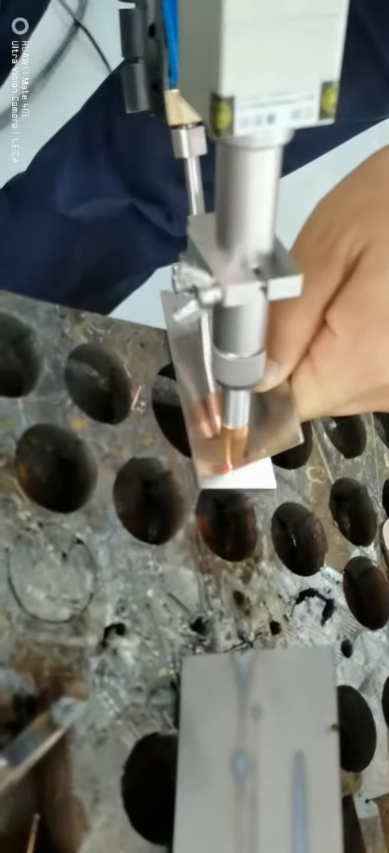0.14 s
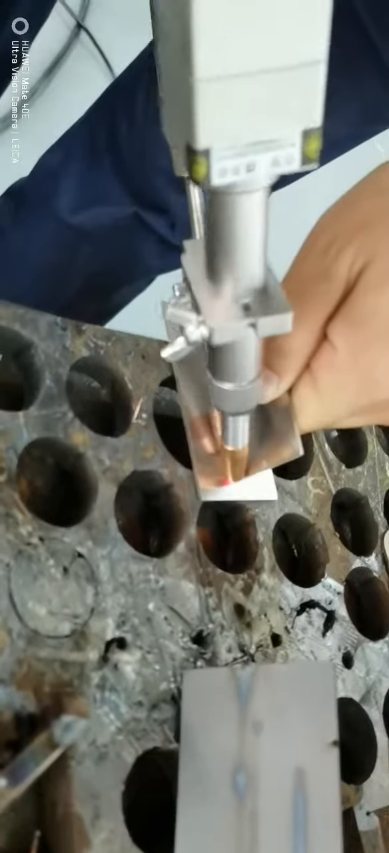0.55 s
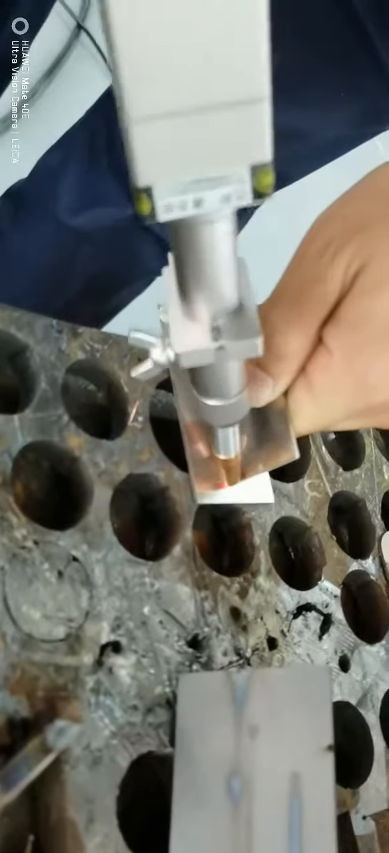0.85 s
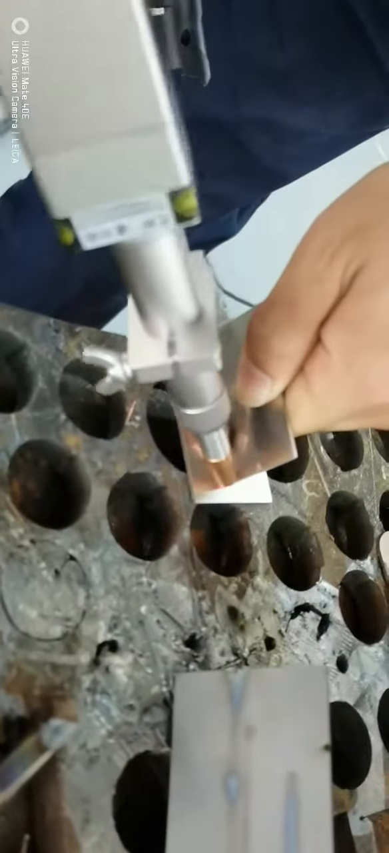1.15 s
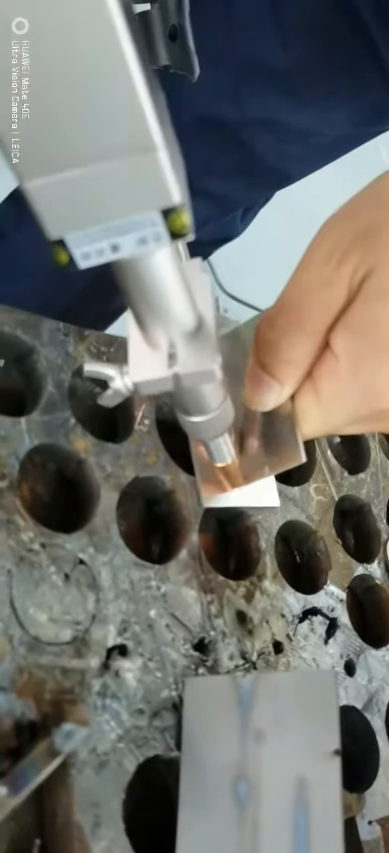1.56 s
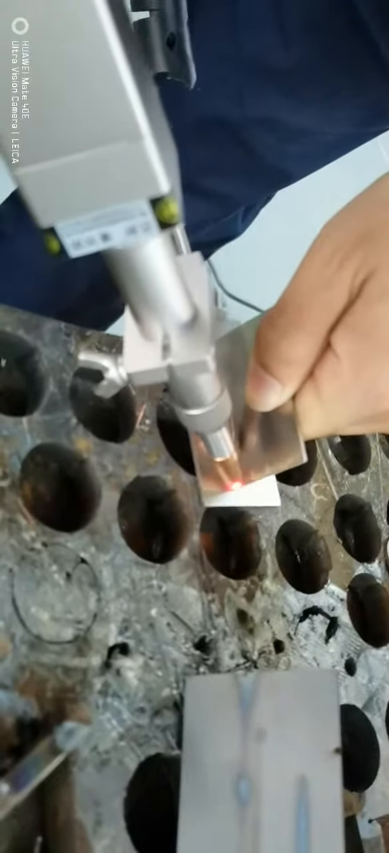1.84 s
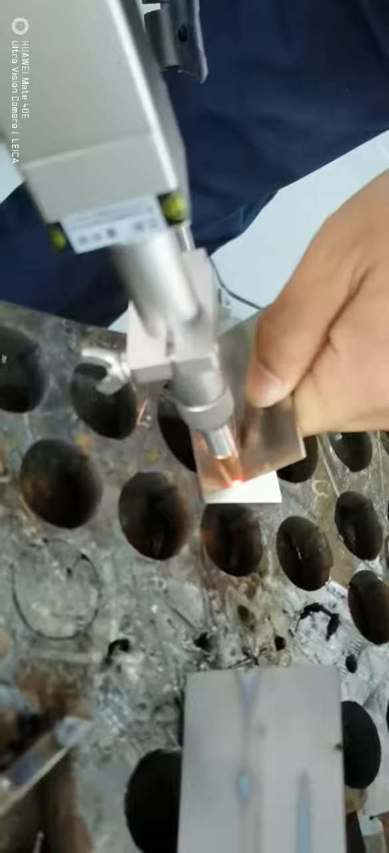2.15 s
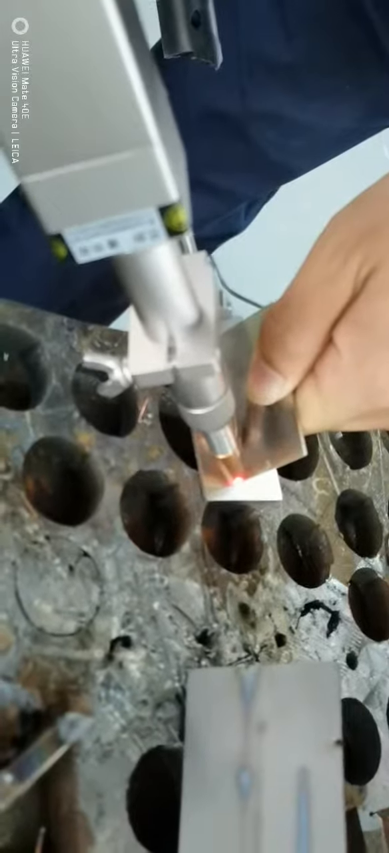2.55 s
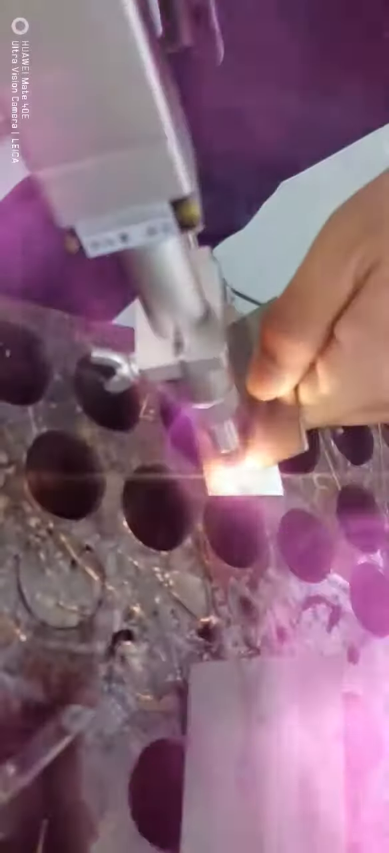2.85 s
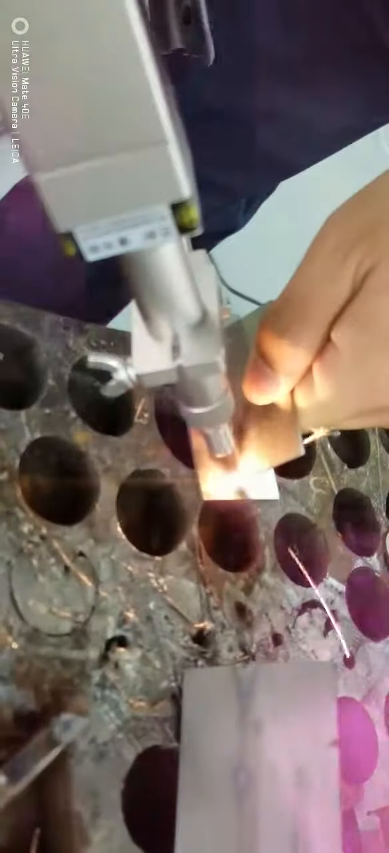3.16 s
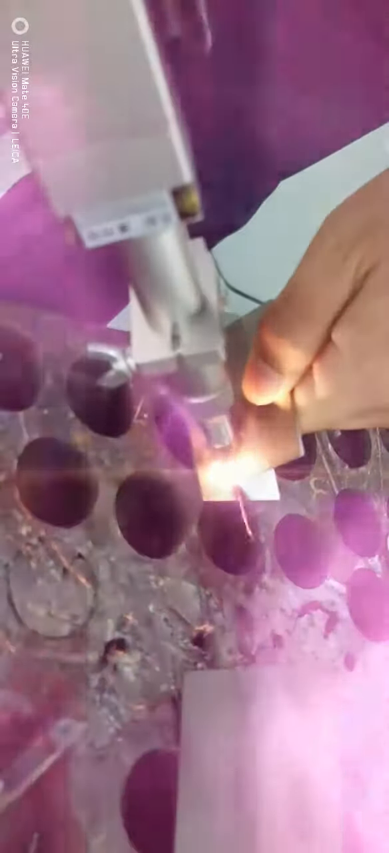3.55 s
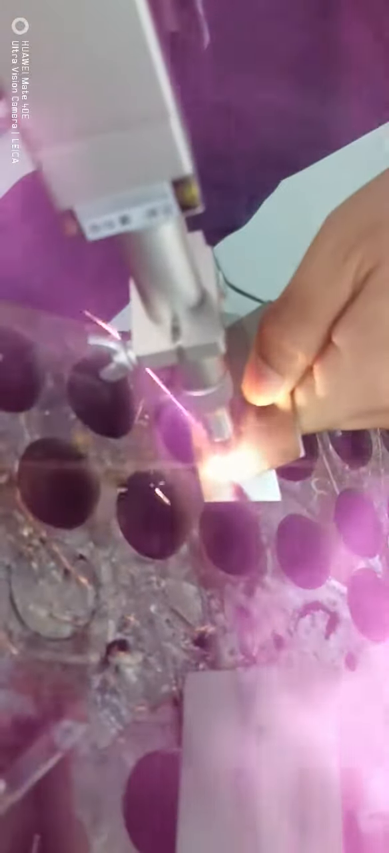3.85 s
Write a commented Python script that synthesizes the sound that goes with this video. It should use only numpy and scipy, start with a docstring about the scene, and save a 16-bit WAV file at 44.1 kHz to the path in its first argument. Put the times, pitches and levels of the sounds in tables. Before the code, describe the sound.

A handheld laser welder hisses loudly, close to the microphone in a workshop. First come faint metal clinks over fan hum and a distant air puff; then a valve clicks, gas rushes and the weld roars brightly.

```python
"""A handheld laser welder close to a two-port microphone in a workshop. A valve clicks, shielding gas
swells from the nozzle, then the weld pool ignites into a bright roaring hiss that overloads the input.
Before that: small metal clinks over a fan hum, and a distant puff of air.
Hisses are shaped noise, whistles are narrow noise bands, struck metal rings in decaying modes."""
import sys
import numpy as np
from scipy import signal
from scipy.io import wavfile
from scipy.ndimage import uniform_filter1d

SR = 44100
rng = np.random.default_rng(int(sys.argv[2]) if len(sys.argv) > 2 else 0)


def pcm_store(signal):
    """Save signal as 16-bit PCM."""
    levels = np.round(np.clip(np.atleast_2d(signal), -1, 1) * 32767)
    wavfile.write(sys.argv[1], SR, levels.astype(np.int16).T)


N = 176400


def amp(db):
    return 10 ** (np.asarray(db) / 20)


def unit_rms(x):
    return x / np.sqrt(np.mean(x ** 2) + 1e-20)


def curve(rows, col=1):
    """Breakpoint column, interpolated at every sample."""
    rows = np.array(rows)
    return np.interp(np.arange(N) / SR, rows[:, 0], rows[:, col])


def pan(pan_db):
    """Port gains for a left-minus-right level."""
    return amp([[pan_db / 2], [-pan_db / 2]])


def add(mix, start_s, sound, pan_db):
    part = mix[:, round(start_s * SR):][:, :len(sound)]
    part += sound[:part.shape[1]] * pan(pan_db)


def bandpass(x, edges_hz):
    return signal.lfilter(*signal.butter(N=2, Wn=edges_hz, btype="band", fs=SR), x)


def hiss(colour, patch_db, flicker_db, bass_db_per_oct, fft_size=512):
    """Unit-RMS stereo noise with drifting patches and flicker; rolls off below the first colour row."""
    rows, hop = np.array(colour), fft_size // 4
    frames = N // hop + 5
    hz = np.fft.rfftfreq(fft_size, 1 / SR) + 1
    per_bin = [np.interp(np.log(hz), np.log(rows[:, 0]), col)[:, None] for col in rows.T[1:]]
    left_db, right_db, coherence, *lead_rad = per_bin
    right_re, right_im, own_re, own_im, patches = rng.standard_normal((frames, len(hz), 5)).T
    patches = uniform_filter1d(patches, size=5, axis=0)
    patches = unit_rms(uniform_filter1d(patches, size=24, axis=1))
    flicker = unit_rms(uniform_filter1d(rng.standard_normal(frames), size=4))
    right = right_re + 1j * right_im
    left = coherence * right * np.exp(1j * sum(lead_rad))
    left += np.sqrt(1 - np.clip(coherence, 0, 1) ** 2) * (own_re + 1j * own_im)
    bass_db = bass_db_per_oct * np.minimum(np.log2(hz / rows[0, 0]), 0)[:, None]
    spectra = np.array([left * amp(left_db), right * amp(right_db)])
    spectra *= amp(bass_db + patch_db * patches + flicker_db * flicker)
    return unit_rms(signal.istft(spectra, nperseg=fft_size, noverlap=fft_size - hop)[1][:, :N])


def noise_band(hz, width_hz):
    """Narrow unit-RMS noise around a fixed or moving pitch."""
    pole = np.exp(-np.pi * width_hz / SR)
    baseband = rng.standard_normal(N) + 1j * rng.standard_normal(N)
    for _ in range(2):
        baseband = signal.lfilter([1], [1, -pole], baseband)
    carrier = np.exp(2j * np.pi * np.cumsum(hz * np.ones(N)) / SR)
    return unit_rms((baseband * carrier).real)


def ring(modes, length_s, spread_hz):
    """Decaying modes of a struck part, each a cluster of beating tones."""
    tones, attack_s = 6, 0.00029
    t = np.arange(0, length_s, 1 / SR)
    out = np.zeros(len(t))
    for hz, db, t60_s in modes:
        detune, phase = rng.random((2, tones, 1))
        tone_hz = hz + spread_hz * (2 * detune - 1)
        out += amp(db - 60 * t / t60_s) * np.sin(2 * np.pi * (tone_hz * t + phase)).sum(0)
    return out * np.minimum(t / attack_s, 1) / np.sqrt(tones)


def workshop():
    """Fans and machines: broad noise and wavering tones."""
    # room noise (frequency [Hz], left [rel. dB], right [rel. dB], coherence [0-1])
    colour = [(40, -4.5, -3, 0.89), (220, 2, 0.5, 0.89), (480, -1.5, -2.5, 0.73), (596, -5, -5.5, .44),
              (805, -0.5, -4.6, 0.57), (900, -8, -5.5, .3), (1210, -9.5, -9, 0.045),
              (1770, -12.5, -8.5, 0.057), (3180, -13.5, -10.5, .05), (5050, -19, -6.5, 0.037),
              (6600, -23, -2.4, 0.14), (7700, -4, -7, 0.15), (8150, -18, -7, .03), (8500, -22.5, -28, .01),
              (11500, -31, -23, .05), (15680, -40, -42, .1)]
    # fan and motor tones (frequency [Hz], base level [dB])
    hum_tones = [(102.3, -71), (209.9, -64.5), (301.5, -64), (425.3, -69), (500.6, -70.5), (802.1, -65.5)]
    t = np.arange(N) / SR
    hum = np.zeros(N)
    for hz, db in hum_tones:
        waver = 0.71 * noise_band(hz, width_hz=16)
        steady = amp(0.5) * np.sin(2 * np.pi * hz * t)
        hum += amp(db) * (waver + steady)
    return hum + amp(-49) * hiss(colour, patch_db=1, flicker_db=0.5, bass_db_per_oct=3, fft_size=1024)


def air_puff():
    """Air let out some way off, with a faint whistle."""
    # air hiss (frequency [Hz], left [rel. dB], right [rel. dB], coherence [0-1])
    colour = [(300, -18.5, -17, 0.69), (950, -16.5, -18.5, 0.33), (1210, -23, -25, .1),
              (1810, -23, -15, 0.16), (2150, -24, -20, .1), (3130, -31, -29, .15), (4700, -22, -8, 0.28),
              (5170, -19.5, -7.5, .3), (5510, -32, -12, .1), (6030, -25, -14, .15), (6350, -16.6, 0, .1),
              (7100, -24, -12, .15), (8100, -13, -18, .2), (8700, -28, -31, .02), (12000, -40, -38, .05),
              (15680, -52, -52, 0.11)]
    # hiss envelope (time [s], level [dB])
    envelope = [(1.7, -80), (1.8, -55), (1.9, -52), (1.925, -46), (1.965, -44), (1.978, -36),
                (1.984, -36.5), (2.01, -33), (2.04, -33.5), (2.18, -37.5), (2.26, -37.5), (2.5, -45)]
    # whistle track (time [s], pitch [Hz], level before port gains [dB])
    track = [(1.76, 1936, -80), (1.81, 1950, -59), (1.9, 1890, -66), (1.96, 1803, -51), (2.05, 1783, -62),
             (2.2, 1780, -50), (2.3, 1770, -56), (2.5, 1760, -58)]
    port_gains = amp([[-3], [2.5]])
    whistle = amp(curve(track, col=2)) * noise_band(curve(track), width_hz=130)
    air = amp(curve(envelope)) * hiss(colour, patch_db=2.5, flicker_db=0.3, bass_db_per_oct=13)
    return air + whistle * port_gains


def clinks():
    """The loose workpiece rattles and rings in close, beating tones."""
    # workpiece modes (frequency [Hz], level [rel. dB], T60 [s])
    modes = [(2230, -15, .45), (4540, -11, .4), (5098, -10, .35), (5310, -6, 0.37), (6067, -12, .4),
             (6440, -10, 0.45), (6700, -4.5, 1), (7000, -5, 0.51), (8122, -6, .15), (8290, -6, .15),
             (8400, -2, .22), (9259, -14, .25), (11220, -22, .25), (11580, -16, .45), (13300, -20, .15)]
    # contacts (time [s], ring gain [dB], rattle gain [dB], left-right [dB])
    contacts = [(0, -41.5, -38, -9), (0.0163, -43.5, -25.5, -16), (.5631, -54, -36.5, -4.5)]
    rattle_t60_s, tail_db, tail_t60_s = 0.012, -21, 0.47
    out, t = np.zeros((2, N)), np.arange(0, 0.3, 1 / SR)
    decay = amp(-60 * t / rattle_t60_s) + amp(tail_db - 60 * t / tail_t60_s)
    for start_s, ring_db, rattle_db, pan_db in contacts:
        rattle = rng.standard_normal(len(t)) * amp(rattle_db) * decay
        add(out, start_s, bandpass(rattle, edges_hz=[5500, 9200]), pan_db)
        add(out, start_s, amp(ring_db) * ring(modes, length_s=0.6, spread_hz=110), pan_db)
    return out


def valve():
    """The gas valve clicks: heavily damped modes."""
    # valve modes (frequency [Hz], level [rel. dB], T60 [s])
    modes = [(380, -15, 0.016), (900, -26, .01), (1610, -20, 0.016), (4100, -12, 0.0071), (6100, 0, 0.0073),
             (7800, -11, 0.0059)]
    out = np.zeros((2, N))
    click = amp(-9.5) * ring(modes, length_s=0.05, spread_hz=60)
    add(out, start_s=2.2803, sound=click, pan_db=-8)
    return out


def spits():
    """Short noise bursts as air and gas start and the pool ignites."""
    # spits (time [s], rise [s], decay onset [s], level [dB], centre [Hz], left-right [dB])
    bursts = [(1.979, .005, .01, -39.5, 6300, -17), (2.261, .004, .02, -43, 9500, 4),
              (2.434, .005, .005, -17, 8900, 2)]
    t60_s = 0.033
    out, t = np.zeros((2, N)), np.arange(0, 0.08, 1 / SR)
    for start_s, rise_s, hold_s, db, hz, pan_db in bursts:
        spit = unit_rms(bandpass(rng.standard_normal(len(t)), edges_hz=[0.8 * hz, 1.11 * hz]))
        envelope = np.minimum(t / rise_s, 1) * amp(db - 60 * np.maximum(t - hold_s, 0) / t60_s)
        add(out, start_s, spit * envelope, pan_db)
    return out


def jet_whistles():
    """Two whistling bands of the jet, below the main roar; the upper one swells late."""
    # lower band envelope (time [s], level [dB])
    lower_envelope = [(2.27, -110), (2.29, -51), (2.41, -32), (2.53, -42), (2.8, -46), (3.2, -36), (4, -35)]
    # upper band envelope (time [s], level [dB])
    upper_envelope = [(3.2, -110), (3.4, -42), (3.55, -28), (3.75, -21), (3.9, -40)]
    lower = amp(curve(lower_envelope)) * noise_band(hz=4066, width_hz=310)
    upper = amp(curve(upper_envelope)) * noise_band(hz=5350, width_hz=550)
    return (lower + upper) * pan(pan_db=-13)


def shielding_gas():
    """Gas rushes through the nozzle."""
    # gas hiss (frequency [Hz], left [rel. dB], right [rel. dB], coherence [0-1], left lead [rad])
    colour = [(520, -39, -42.5, 0.89, 0.2), (2430, -34, -32, 0.35, -1.2), (2890, -27, -18.5, 0.58, -1.5),
              (3450, -39, -27.5, 0.31, -3), (4090, -34, -16, 0.94, -6), (4840, -34, -23, 0.44, 1),
              (5550, -15, -7.5, 0.5, -1), (6200, -20, -1, 0.32, 3), (6420, -11.5, 0, 0.65, 3.5),
              (7120, -18, -7.5, 0.37, -8.5), (7430, -2.5, -8, 0.89, 8), (7860, -22, -21, 0.96, 4.3),
              (8620, -10.5, -21, 1, 4), (10000, -37, -35, 0.2, 5), (11540, -35, -33, 0.21, 12.0),
              (12500, -26, -25, 0.78, 11), (13950, -44, -45, 0.31, 11), (14640, -35, -33, 0.79, 5),
              (15330, -55, -53, 0.53, 6.9)]
    # gas envelope (time [s], level [dB])
    envelope = [(2.255, -70), (2.268, -38), (2.29, -26), (2.326, -18.5), (2.37, -14.5), (2.424, -14.5),
                (2.5, -17), (2.7, -17.5), (4, -18)]
    return amp(curve(envelope)) * hiss(colour, patch_db=2.5, flicker_db=0.9, bass_db_per_oct=5)


def weld_pool():
    """The pool ignites and roars, brighter than the gas."""
    # base roar (frequency [Hz], left [rel. dB], right [rel. dB], coherence [0-1], left lead [rad])
    base_colour = [(2540, -31.6, -28.8, 0.14, 2.7), (3700, -29.6, -23.8, 0.14, 2.4),
                   (3920, -23.9, -19.3, 0.42, 0.3), (4050, -24.0, -14.4, 0.22, -0.2),
                   (4480, -26.3, -22.6, 0.04, -0.5), (5380, -18.7, -11.4, 0.69, 1.7),
                   (5600, -21.0, -12.6, 0.55, 1.5), (5900, -22.3, -7.3, 0.64, 1.7),
                   (5990, -19.6, -5.7, 0.77, 1.7), (6070, -19.6, -2.4, 0.65, 2.0),
                   (6160, -16.2, 0.0, 0.87, 2.5), (6290, -19.4, -2.0, 0.64, 3.2),
                   (6370, -15.3, -8.6, 0.66, 3.9), (6460, -13.2, -8.7, 0.87, 2.9),
                   (6630, -13.7, -7.4, 0.88, 2.6), (6720, -15.9, -9.9, 0.76, 2.5),
                   (6890, -15.5, -4.2, 0.76, 2.3), (7020, -19.1, -4.0, 0.32, -0.3),
                   (7060, -18.2, -3.2, 0.61, -1.2), (7190, -10.2, -4.5, 0.9, -1.4),
                   (7540, -6.8, -17.0, 0.46, -1.8), (7620, -9.3, -19.0, 0.3, -2.4),
                   (7840, -6.7, -17.2, 0.58, -1.7), (7970, -13.2, -19.4, 0.26, 1.2),
                   (8230, -12.7, -12.0, 0.81, 3.8), (8400, -5.4, -14.1, 0.83, 4.5),
                   (8480, -3.6, -12.6, 0.9, 4.1), (8660, -5.3, -13.4, 0.89, 4.7),
                   (8910, -13.8, -22.6, 0.21, 5.2), (9170, -9.1, -23.4, 0.22, 4.7),
                   (9300, -13.2, -25.5, 0.13, 3.3), (9730, -16.9, -19.5, 0.71, 0.6),
                   (9990, -20.5, -24.4, 0.25, 3.0), (10940, -22.3, -18.5, 0.56, 0.1),
                   (11240, -17.8, -23.9, 0.19, 1.6), (11710, -24.1, -20.3, 0.36, -0.3),
                   (12060, -20.3, -22.6, 0.37, -1.9), (12400, -23.6, -18.1, 0.15, -2.2),
                   (12830, -24.8, -25.6, 0.54, -3.1), (13440, -21.0, -23.5, 0.37, -2.6),
                   (13740, -29.3, -29.4, 0.69, -3.0), (14210, -21.8, -25.3, 0.14, -3.2),
                   (14600, -21.1, -24.8, 0.3, -4.5), (14770, -27.7, -30.0, 0.09, -3.4),
                   (15500, -24.1, -21.1, 0.54, -6.0), (15630, -26.7, -23.7, 0.18, -5.5)]
    # roar envelope (time [s], level [dB])
    envelope = [(2.4, -53), (2.43, -16), (2.44, -12.5), (2.455, -18), (2.5, -9.5), (2.54, -8.5),
                (2.62, -5.5), (2.78, -4), (3.1, -5), (3.2, -5.5), (3.25, -8), (3.3, -4.5), (3.37, -6),
                (3.44, -4.5), (3.7, -4.5), (4, -4.5)]
    contrast = 1.065  # sharpens the roar's peaks and dips
    coherence_exponent = 0.8  # makes the roar more alike in left and right
    colour = np.array(base_colour)
    colour[:, 1:3] *= contrast
    colour[:, 3] **= coherence_exponent
    roar = hiss(colour, patch_db=1.64, flicker_db=0.5, bass_db_per_oct=0.09, fft_size=1024)
    return amp(curve(envelope)) * roar


def scene():
    background = workshop() + air_puff()
    torch = shielding_gas() + weld_pool() + jet_whistles()
    return background + torch + spits() + clinks() + valve()


def record(dry):
    """Soft input overload near full scale, then a band limit."""
    knee, cutoff_hz = 6, 15720
    clipped = dry / (1 + abs(dry) ** knee) ** (1 / knee)
    lowpass = signal.firwin(1023, cutoff_hz, window=("kaiser", 9), fs=SR)
    return signal.oaconvolve(clipped, lowpass[None], "same")


dry = scene()
out = record(dry)
pcm_store(out)
```